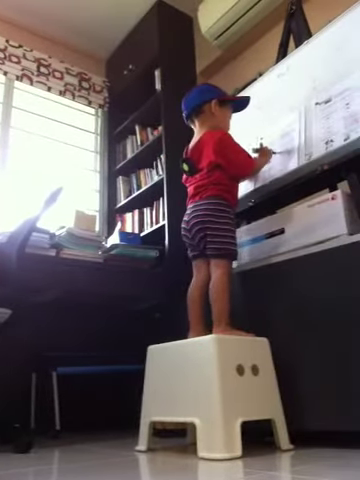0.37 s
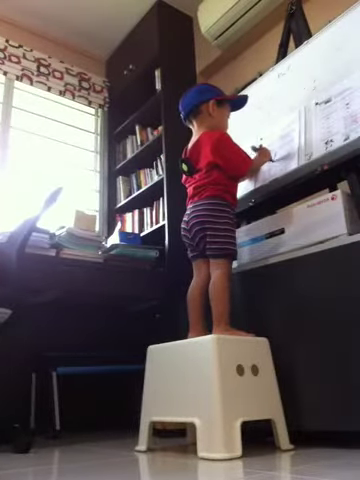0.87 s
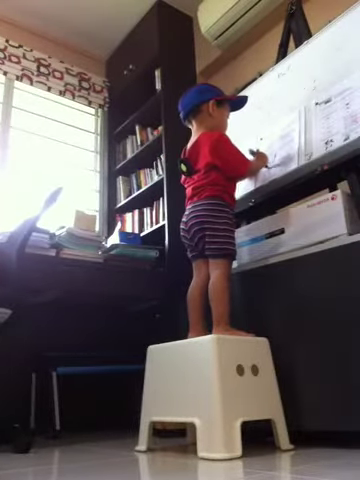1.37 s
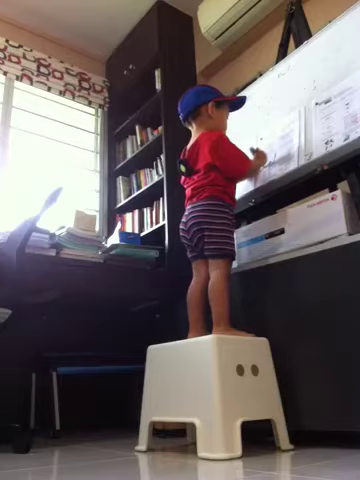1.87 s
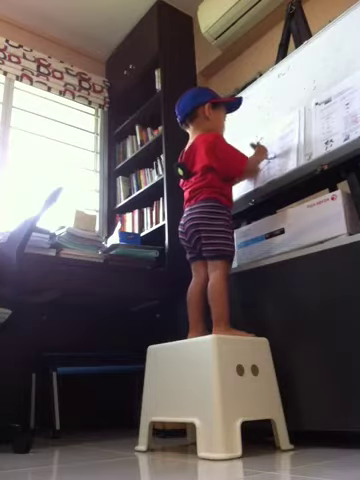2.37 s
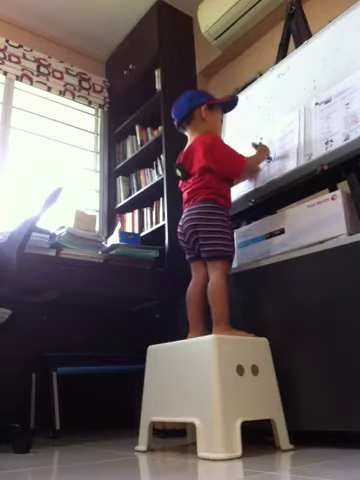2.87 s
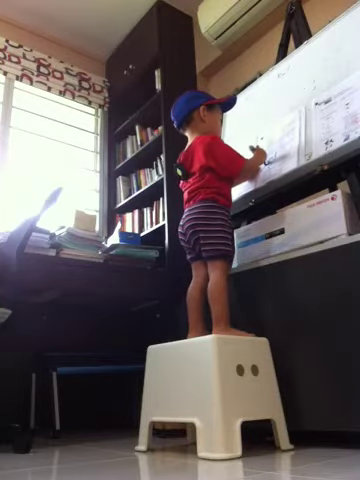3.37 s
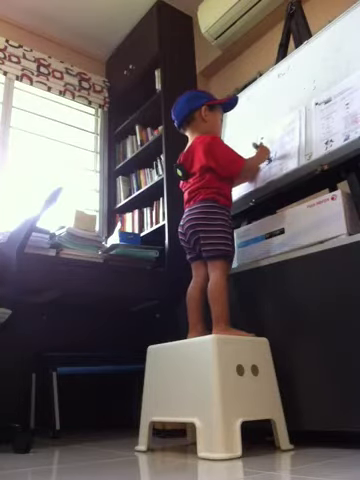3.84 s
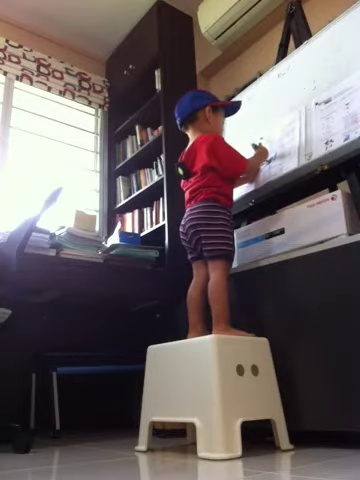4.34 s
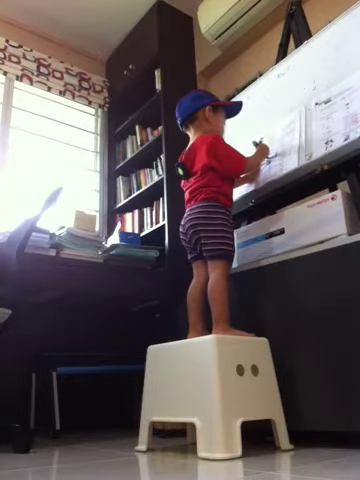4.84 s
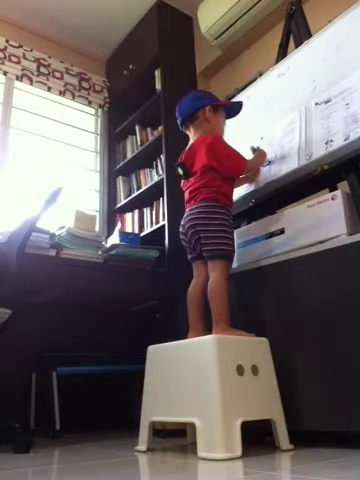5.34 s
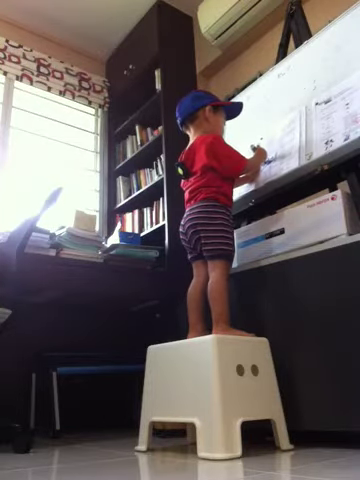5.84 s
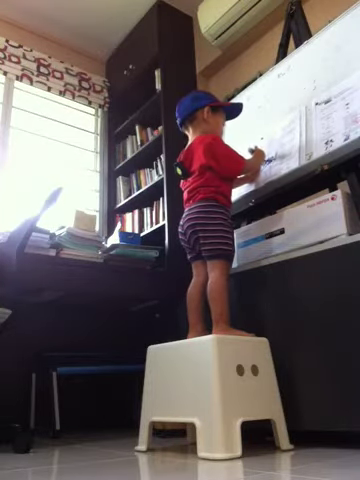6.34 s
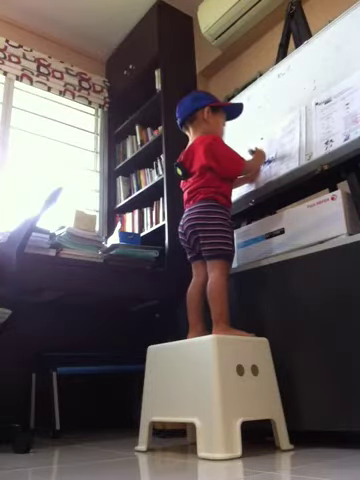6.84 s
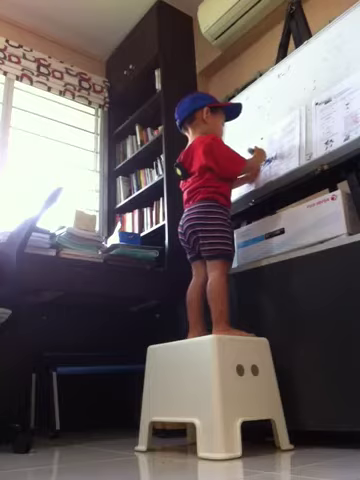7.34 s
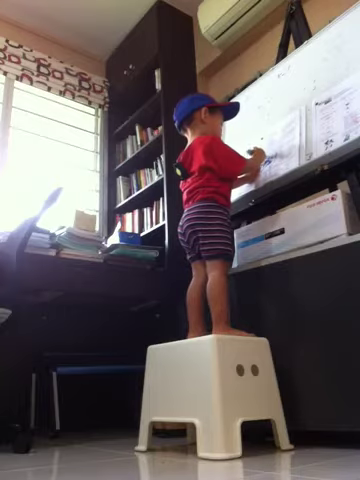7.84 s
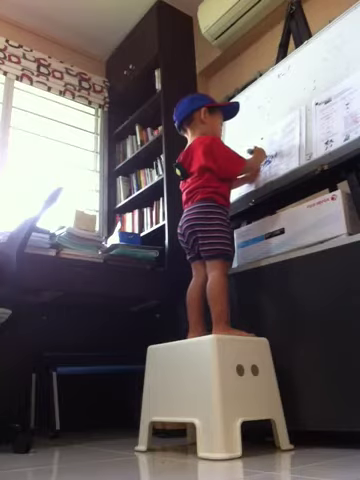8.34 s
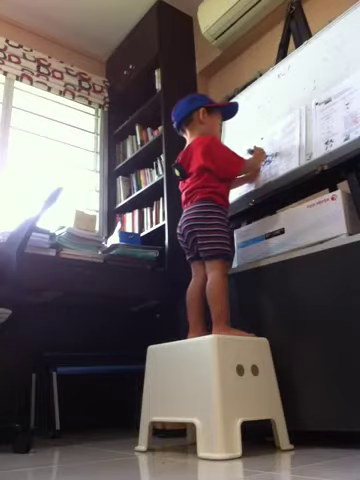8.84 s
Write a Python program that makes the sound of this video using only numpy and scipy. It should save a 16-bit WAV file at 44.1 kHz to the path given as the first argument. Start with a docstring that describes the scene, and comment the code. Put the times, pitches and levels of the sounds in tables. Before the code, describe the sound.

Indoors in a hard tiled room, a small child scribbles on a whiteboard with a felt marker: short, dry, hissy strokes, sparse and faint at first, then quick and nearly continuous. A few light knocks of the tip leave a brief room tail. Underneath, a heavy engine far outside hums very low, sinks in pitch, then pulls away again. Soft room air, recorded by a phone a little way off.

```python
"""A felt marker scribbles quick strokes on a whiteboard in a tiled room and now and then knocks on it.
Its hiss and rings are noise shaped stroke by stroke; the knocks are decaying modes with a room tail.
Far outside a heavy engine, a firing tone with two overtones, slows down and pulls away again.
Room air and a thin hiss are filtered noise; an electric whine is a stack of wavering sines.
The microphone is a phone's: it samples at half rate, repeats every sample and sits on a drifting offset."""
import sys
import numpy as np
from scipy import signal
from scipy.fft import rfft, irfft, next_fast_len
from scipy.io import wavfile
from scipy.ndimage import uniform_filter1d

SR = 44100
rng = np.random.default_rng(int(sys.argv[2]) if len(sys.argv) > 2 else 0)


def persist_wave(psi):
    """Save psi, clipped to +-1, as 16-bit WAV."""
    counts = np.round(np.clip(psi, -1, 1) * 32767).astype(np.int16)
    wavfile.write(sys.argv[1], SR, np.atleast_2d(counts).T)


def boost(x):
    """Linear amplitude factor 10**(x/20) for a level x in decibels (scalar or array-like)."""
    u = np.asarray(x, float) / 20
    return 10 ** u


N = 394694  # samples

# engine firing rate: (time [s], rate [Hz])
FIRING_RATE = [(0, 41.5), (.7, 39.5), (1.1, 37.2), (2.1, 34.5), (2.8, 33.3), (3.9, 33), (4.2, 35.8),
               (5.6, 41.6), (6.65, 45.3), (7.35, 46.9), (8.05, 48.1), (8.4, 47.2), (8.95, 42.3)]
# firing tone before its dips and waver: (time [s], level [dB rms])
FIRING_LEVEL = [(0, -41), (.15, -39.5), (.45, -46), (.8, -45), (1.3, -52), (2.14, -43.5), (2.5, -50),
                (3.1, -47.5), (3.95, -54.5), (4.2, -41.5), (4.5, -41), (4.8, -43), (5.3, -35), (5.5, -37),
                (5.9, -41), (6.35, -40), (6.9, -46), (7.07, -38.5), (7.2, -45.5), (8.5, -45), (8.95, -48.5)]
# the tone dips briefly; a negative depth lifts it: (time [s], depth [dB])
ENGINE_DIPS = [(.66, 23), (1.01, 24), (1.32, -2), (1.49, 0), (1.84, 9), (2.04, 14), (2.32, 18), (2.95, 18),
               (3.35, 1), (3.56, 8), (4.05, 14), (4.39, 23), (5.62, 21), (6.19, 15), (7.68, 2), (8.67, 7)]
DIP_S, WAVER_DB = 0.066, 0.6  # a dip shrinks to 1/e of its depth over this time on either side
OVERTONES_DB = (-61.5, -71)  # second and third, if on the resonance, before they waver
ROOM_RING_HZ, ROOM_RING_WIDTH_HZ = 112, 13.5  # the room favours overtones near this resonance

# spectrum of the room air, shape only: (frequency [Hz], density [dB per Hz])
AIR_SPECTRUM = [(12, 4), (30, -4), (55, -8.5), (75, -24), (115, -20), (240, -20), (400, -23), (490, -25.5),
                (600, -29.5), (1000, -32.5), (1600, -38), (2600, -45), (5200, -48), (8000, -50),
                (10500, -55)]
AIR_DB = -51.5  # rms, before its slow waver
# narrow low peaks in the air noise: (frequency [Hz], width [Hz], level [dB rms])
AIR_PEAKS = [(116, 3.5, -88.5), (233.7, 8.1, -74.5), (273.4, 7.6, -78), (393.4, 7.9, -76)]
# electric whine before it wavers: {multiple of the base pitch: level [dB rms]}
WHINE_LEVELS = {1: -84.5, 2: -83.5, 4: -99.5, 6: -100, 7: -99, 10: -99, 13: -99}
WHINE_HZ = 444.43

# thin high hiss before it wavers: (time [s], level [dB rms])
INSECT_LEVEL = [(0, -104), (1.5, -98), (3.5, -85), (5.6, -81), (7.2, -87.5), (8.95, -101)]
INSECT_HZ, INSECT_WIDTH_HZ = 5150, 850

# marker strokes, gains before the common trims and flutter: (start [s], length [s], felt hiss [dB],
# board ring above hiss [dB], barrel ring above hiss [dB], treble above hiss [dB])
STROKES = [(0.268, 0.12, -77, -9, 1, 3), (0.447, 0.095, -74.5, -10, -3, 2.5),
           (0.597, 0.097, -72, -1, 1, -0.5), (0.92, 0.12, -73.5, -13, 3, 4.5),
           (1.144, 0.062, -65, -3, -6, -2.5), (1.387, 0.15, -69, -15, -18, 4.5),
           (1.565, 0.12, -69.5, -8, -8, 2), (1.765, 0.13, -68, -2, -11, 2.5),
           (1.88, 0.066, -68.5, -4, -6, 0), (1.952, 0.17, -69, -8, -11, 1), (2.305, 0.13, -71, -4, -11, 0),
           (2.478, 0.13, -64, -5, -6, 1.5), (2.622, 0.15, -68, -9, -2, -0.5),
           (2.801, 0.12, -63, -4, -7, 0.5), (2.926, 0.15, -68, -9, -5, 1.5), (3.108, 0.12, -64, -6, -13, 0),
           (3.307, 0.095, -69, -5, -8, -3.5), (3.423, 0.11, -61, -3.5, -6, -1.5),
           (3.612, 0.097, -67.5, -6, -10, -6), (3.806, 0.32, -71.5, -19, -2, -1),
           (4.051, 0.11, -63.5, -5.5, -12, -0.5), (4.19, 0.18, -66.5, -4, -3, -2.5),
           (4.512, 0.1, -74.5, 1, 3, -1.5), (4.79, 0.1, -68, -2, -1, -4.5),
           (5.037, 0.135, -66.5, -2.5, -9, -1), (5.2, 0.13, -67.5, -9, -5, -1.5),
           (5.357, 0.14, -64, -4, -8, 2), (5.563, 0.13, -64, -7, -5, -2.5),
           (5.785, 0.12, -65.5, -3, -4.5, -1.5), (6.314, 0.15, -67.5, -0.5, -2, -3.5),
           (6.52, 0.14, -67.5, -4, -4, 2.5), (6.74, 0.089, -65, -8, -7, -2.5),
           (6.974, 0.076, -66.5, -3.5, 0, -2), (7.095, 0.067, -62.5, -9, -6, -3.5),
           (7.238, 0.12, -66, -5, -4, -2.5), (7.433, 0.12, -67.5, -4, -2, 1),
           (7.623, 0.094, -69, 0, -1, 0.5), (7.702, 0.092, -68.5, -2, 2, -3),
           (7.765, 0.12, -66, -4, -8, 1.5), (7.943, 0.13, -68.5, -3, -3, 0),
           (8.158, 0.15, -67, -0.5, -4, -2), (8.41, 0.12, -64.5, -2.5, -5, -2.5),
           (8.57, 0.12, -67.5, -2, -4, 5), (8.774, 0.098, -66.5, -5, -5, 3)]
# spectrum of the felt hiss, shape only: (frequency [Hz], density [dB per Hz])
FELT_SPECTRUM = [(1470, -58), (2500, -5), (3280, -7.5), (4310, -6), (5090, -5.5), (6490, -7), (8520, -1.5),
                 (10300, -3), (13400, -35), (22000, -120)]
# faint rings of the felt tip, before flutter: (frequency [Hz], width [Hz], level [dB rms])
FIBRE_RINGS = [(7600, 250, -20), (8200, 260, -15.5), (9150, 240, -14.5), (9750, 260, -15)]
FIBRE_SPREAD = 0.035  # the fibre rings shift by this share from stroke to stroke
BOARD_RING_HZ, BOARD_WIDTH_HZ = 2070, 510
# the grip differs from stroke to stroke and detunes the barrel
BARREL_HZ, BARREL_SPREAD_HZ, BARREL_WIDTH_HZ = 3365, 150, 900
FLUTTER_DB = 1.3
# every stroke touches down at once, swells with speed, slows, then dies in the room
TOUCH_S, DIE_S, SLOW_DB = 0.007, 0.24, -5
TOUCH_DB, HISS_TOUCH_DB, TREBLE_TOUCH_DB = -1.5, -4, -7.5
# a stroke at the usual level is fastest at this share of its length; stronger ones gather speed longer
USUAL_DB, FASTEST, LATER_PER_DB = -67, 0.45, 0.025
TREBLE_LAG = 0.14  # the treble peaks this share of the stroke later than the body of the hiss
# the scratch turns brighter and duller as pressure changes
SHEEN_HINGE_HZ, SHEEN_DB, SHEEN_PER_S = 7000, 1.5, 25

# the tip judders and one ring stands out; level before the swell, length at half its height:
# (middle [s], length [s], frequency [Hz], level [dB rms])
JUDDERS = [(0.662, 0.055, 3430, -80), (1.172, .04, 3400, -77), (1.497, 0.045, 2150, -74),
           (1.591, 0.037, 3500, -80), (1.811, .03, 3650, -79), (1.915, .035, 2200, -74),
           (1.916, .035, 3400, -80), (1.985, 0.06, 3720, -73.5), (2.05, .04, 3800, -83),
           (1.985, .05, 5300, -78), (2.515, .045, 2070, -73), (2.577, .03, 2150, -80),
           (2.58, .04, 3250, -83), (2.64, .04, 3500, -77), (2.88, .05, 2100, -78), (2.958, .06, 3400, -76),
           (3.135, 0.046, 2050, -74), (3.2, .04, 2250, -71), (3.183, .08, 3230, -74),
           (3.657, .05, 3700, -76), (4.126, .03, 3540, -67), (4.228, .05, 3640, -76),
           (4.533, 0.041, 3380, -80), (5.067, .05, 1950, -80), (5.125, .025, 3550, -80),
           (5.385, .045, 1950, -75), (5.463, .06, 3800, -78), (5.48, .03, 1900, -73), (5.6, .04, 5000, -77),
           (5.82, .05, 2100, -83), (6.34, 0.038, 3500, -74), (6.4, 0.051, 3500, -69),
           (6.77, .05, 3800, -80), (7.283, .015, 3350, -73), (7.33, .04, 2150, -76), (7.47, .05, 3450, -84),
           (7.643, .035, 3550, -75), (7.717, .03, 3500, -82), (7.753, .065, 2030, -75),
           (8.263, .05, 2050, -83), (8.243, .08, 3450, -82), (8.46, .015, 1990, -75),
           (8.496, .07, 3480, -76), (8.505, 0.049, 2030, -71), (8.622, 0.081, 3650, -79),
           (8.8, 0.037, 3660, -76)]
JUDDER_WIDTH_SHARE, JUDDER_GRAIN_DB = 0.16, 2.2

# knocks of the tip on the board: (time [s], blow peak [dB], low thud above peak [dB],
# room answer above peak [dB], skid above peak before its fade [dB])
KNOCKS = [(1.147, -42, -8, -3, -20), (3.4777, -43, -7.5, -1.5, -16), (3.4865, -52, -14, 2, -14),
          (4.1107, -44, -16, 0.5, -14), (4.119, -52.5, 7.5, -1, -7), (7.105, -41, -15, -1, -18),
          (7.271, -50, -10, 1.5, -20)]
# modes of the blow, relative levels: (frequency [Hz], level [dB], t60 [s])
KNOCK_MODES = [(1085, 4.5, 0.015), (1340, 8.5, 0.0089), (1580, 7, 0.0075), (2230, 4, 0.014),
               (2780, 2, 0.013), (3400, -3.5, 0.016), (4330, -4, 0.0065)]
# modes of the whole board, relative levels: (frequency [Hz], level [dB], t60 [s])
THUD_MODES = [(132, 2, 0.034), (227, -1, 0.046), (414, -16, 0.027), (610, -8, 0.027)]
PUSH_S = 0.00121  # the felt tip is soft: the blow builds up over this time
ROOM_T60_S, ROOM_TREBLE_T60_S = 0.47, 0.15
THUD_ROOM_DB = -3.5  # the room answers the thud more weakly
FAR_WALL_S, FAR_WALL_DB = 0.024, 2.5  # the far wall answers late: its lift is full at this delay
# after a knock the tip skids roughly
SKID_BAND_HZ, SKID_T60_S, SKID_ROUGH_DB, SKID_BUILD_S = (1100, 9500), 0.18, 2.9, 0.0097

EDGE_HZ = 10610  # low-pass ahead of the half-rate sampling
OFFSET, DRIFT_DB = 0.0246, -57  # steady offset; rms of its drift


def curves(table):
    """Columns of a table as signals."""
    s, *columns = np.transpose(table)
    return [np.interp(np.arange(N) / SR, s, c) for c in columns]


def level(x, db):
    """Set the rms level."""
    return x * boost(db) / np.sqrt(np.mean(x ** 2))


def colour(x, points):
    """Shape the spectrum along (frequency [Hz], level [dB]) points."""
    hz, db = np.transpose(points)
    size = next_fast_len(N)
    f = np.arange(size // 2 + 1) * SR / size + 1e-3  # keeps the logarithm finite at 0 Hz
    gain = boost(np.interp(np.log(f), np.log(hz), db))
    return irfft(rfft(x, size) * gain, size)[:N]


def ring(x, hz, width_hz, wander=0):
    """A steep resonance whose centre may wander: shift down, low-pass twice, shift back."""
    turn = np.exp(2j * np.pi * np.cumsum(hz * (1 + wander) + np.zeros(len(x))) / SR)
    pole = np.exp(-np.pi * width_hz / SR)
    twice = np.convolve([1, -pole], [1, -pole])
    return (signal.lfilter([1], twice, x / turn) * turn).real


def walk(rate):
    """Random levels held 1 / rate s and slewed twice; spread 1."""
    k = int(SR / rate)
    held = np.repeat(rng.standard_normal(N // k + 1), k)
    slewed = uniform_filter1d(uniform_filter1d(held, k), k)[:N]
    return slewed / slewed.std()


def engine():
    """Far outside: only the firing tone and two weak, wavering overtones come through the walls."""
    t, hz = np.arange(N) / SR, curves(FIRING_RATE)[0]
    phase = 2 * np.pi * np.cumsum(hz) / SR
    dips_db = sum(depth * np.exp(-np.abs(t - s) / DIP_S) for s, depth in ENGINE_DIPS)
    tone_db = curves(FIRING_LEVEL)[0] - dips_db + WAVER_DB * walk(8.2)
    tone = boost(tone_db) * np.sin(phase)
    for k, over_db in enumerate(OVERTONES_DB, start=2):
        favour = 1 / np.hypot(1, 2 * (k * hz - ROOM_RING_HZ) / ROOM_RING_WIDTH_HZ)
        tone = tone + favour * boost(over_db + 3.2 * walk(5)) * np.sin(k * phase)
    return np.sqrt(2) * tone  # a sine's peak is this much above its rms


def room_air():
    """A broad, slowly wavering rush of noise with a few narrow low resonances."""
    rush = colour(rng.standard_normal(N), [(1.4, -37.5)] + AIR_SPECTRUM)
    rush = level(rush, AIR_DB) * boost(1.33 * walk(2.92))
    peaks = sum(level(ring(rng.standard_normal(N), hz, width), db) for hz, width, db in AIR_PEAKS)
    return rush + peaks


def electric_whine():
    """Thin multiples of one slightly unsteady pitch, each wavering in level."""
    phase = 2 * np.pi * np.cumsum(WHINE_HZ + 0.8 * walk(6)) / SR
    whine = sum(boost(db + 2 * walk(7)) * np.sin(k * phase + k) for k, db in WHINE_LEVELS.items())
    return np.sqrt(2) * whine


def insects():
    """A faint narrow band of noise, perhaps insects, that swells and fades."""
    hiss = level(ring(rng.standard_normal(N), INSECT_HZ, INSECT_WIDTH_HZ), 0)
    return hiss * boost(curves(INSECT_LEVEL)[0] + 1.1 * walk(12))


def stroke_swell(t, s, length, fastest, touch_db):
    """Level in dB: touch, a rounded swell to the fastest moment, slowing, and the fade in the room."""
    peak_s = max(fastest * length, 2 * TOUCH_S)
    moments = s + np.array([0, TOUCH_S, peak_s, length, length + DIE_S])
    swell_db = np.interp(t, moments, [-30, touch_db, 0, SLOW_DB, -40])
    return uniform_filter1d(swell_db, size=300, mode="nearest")


def stroke_levels():
    """Amplitudes of hiss body, treble, board and barrel; overlapping strokes add in power."""
    t, power = np.arange(N) / SR, np.zeros((4, N))
    for s, length, db, board_db, barrel_db, treble_db in STROKES:
        span = slice(int(s * SR), int((s + length + DIE_S) * SR))
        fastest = np.clip(FASTEST + LATER_PER_DB * (db - USUAL_DB), 0, 0.8)
        later = min(fastest + TREBLE_LAG, 0.95)
        # the rings answer the first touch; the hiss depends more on speed, its treble most
        body_db = stroke_swell(t[span], s, length, fastest, HISS_TOUCH_DB)
        bright_db = stroke_swell(t[span], s, length, later, TREBLE_TOUCH_DB) + treble_db
        rings_db = stroke_swell(t[span], s, length, fastest, TOUCH_DB)
        layers_db = np.array([body_db, bright_db, rings_db + board_db, rings_db + barrel_db])
        power[:, span] += boost(db + layers_db) ** 2
    return np.sqrt(power)


def marker():
    """Felt fibres catch and slip densely; the slips hiss and ring the board and the barrel."""
    starts = np.transpose(STROKES)[0]
    stroke = np.maximum(np.searchsorted(starts, np.arange(N) / SR) - 1, 0)
    barrel_grip, fibre_grip = rng.standard_normal((len(STROKES), 2))[stroke].T
    slips_db = 1.27 * rng.exponential(size=N) + 0.31 * walk(90)
    slips = rng.standard_normal(N) * boost(slips_db)
    hiss = level(colour(slips, FELT_SPECTRUM), 0.16)
    body = signal.sosfiltfilt(signal.butter(2, SHEEN_HINGE_HZ, fs=SR, output="sos"), hiss)
    treble = (hiss - body) * boost(SHEEN_DB * walk(SHEEN_PER_S))
    for hz, width, db in FIBRE_RINGS:
        fibre = ring(slips, hz, width, FIBRE_SPREAD * fibre_grip + 0.014 * walk(11))
        treble += level(fibre, db) * boost(1.8 * walk(11))
    body = body * boost(0.61 * walk(20))
    # grip flutters, so each ring comes and goes within a stroke
    board = ring(slips, BOARD_RING_HZ, BOARD_WIDTH_HZ, 0.016 * walk(11))
    board = level(board, -5.5) * boost(FLUTTER_DB * walk(40))
    barrel_hz = BARREL_HZ + BARREL_SPREAD_HZ * barrel_grip
    barrel = ring(slips, barrel_hz, BARREL_WIDTH_HZ, 0.017 * walk(15))
    barrel = level(barrel, -9.0) * boost(FLUTTER_DB * walk(40))
    strokes = np.sum(stroke_levels() * [body, treble, board, barrel], axis=0)
    return strokes + judders(slips)


def judders(slips):
    """Brief, grainy swells of one ring, driven by the same slips; its pitch wavers a little."""
    out, grain, waver = np.zeros(N), boost(JUDDER_GRAIN_DB * walk(70)), 0.008 * walk(30)
    for s, length, hz, db in JUDDERS:
        span = slice(int((s - length) * SR), int((s + length) * SR))
        rung = ring(slips[span], hz, JUDDER_WIDTH_SHARE * hz, waver[span]) * grain[span]
        out[span] += level(rung, db) * np.hanning(len(rung))
    return out


def fade(t, t60):
    """Exponential decay by 60 dB in t60 seconds."""
    return np.exp(-np.log(1000) * t / t60)


def struck(t, table):
    """Modes pushed by the soft tip, in a mix that differs with every blow; peak 1."""
    mix_db = 1.5 * rng.standard_normal(len(table))
    modes = sum(boost(db + m) * np.sin(2 * np.pi * hz * (t - PUSH_S)) * fade(t, t60)
                for (hz, db, t60), m in zip(table, mix_db))
    x = np.minimum(t / PUSH_S, 1) ** 2 * modes
    return x / np.abs(x).max()


def room_echoes(t):
    """Scattered echoes of unit energy from the room; the tail loses its treble first."""
    noise = rng.standard_normal(SR)
    low = signal.sosfilt(signal.butter(2, 1900, fs=SR, output="sos"), noise)
    echoes = low * fade(t, ROOM_T60_S) + (noise - low) * fade(t, ROOM_TREBLE_T60_S)
    echoes = echoes * np.minimum(t / 0.0051, 1)
    echoes = echoes * boost(FAR_WALL_DB * np.clip(2 * t / FAR_WALL_S - 1, 0, 1))
    return echoes / np.sqrt(np.sum(echoes ** 2))


def tip_skid(t):
    """Rough band noise of the skidding tip, which builds up and fades."""
    grit = rng.standard_normal(SR) * boost(SKID_ROUGH_DB * walk(170)[:SR])
    band = signal.butter(2, SKID_BAND_HZ, "band", fs=SR, output="sos")
    skid = level(signal.sosfilt(band, grit), 0)
    return skid * fade(t, SKID_T60_S) * np.minimum(t / SKID_BUILD_S, 1)


def knocks():
    """Each knock briefly rings the board's modes, the tip skids and the room answers."""
    out, t = np.zeros(N + SR), np.arange(SR) / SR
    for s, db, thud_db, room_db, skid_db in KNOCKS:
        blow = struck(t, KNOCK_MODES)
        thud = boost(thud_db) * struck(t, THUD_MODES)
        tail = signal.fftconvolve(blow + boost(THUD_ROOM_DB) * thud, room_echoes(t))[:SR]
        knock = blow + thud + boost(room_db) * tail + boost(skid_db) * tip_skid(t)
        start = int(s * SR)
        out[start:start + SR] += boost(db) * knock
    return out[:N]


def scene():
    """All sources on one channel."""
    outside_and_room = engine() + room_air() + electric_whine() + insects()
    return (outside_and_room + marker() + knocks())[None]


def band_limit(x):
    """A steep low-pass at the top of the band."""
    return signal.sosfilt(signal.butter(12, 15500, fs=SR, output="sos"), x)


def record(dry):
    """Half-rate sampling: each sample is held twice, so the treble is mirrored about a quarter of SR."""
    low_pass = signal.cheby1(10, 0.3, EDGE_HZ, fs=SR, output="sos")
    half = signal.sosfilt(low_pass, dry)[:, ::2]
    held = np.repeat(half, 2, axis=1)[:, :N]
    mix = held + OFFSET + boost(DRIFT_DB) * walk(1.514)
    return band_limit(mix)


dry = scene()
out = record(dry)
persist_wave(out)
```